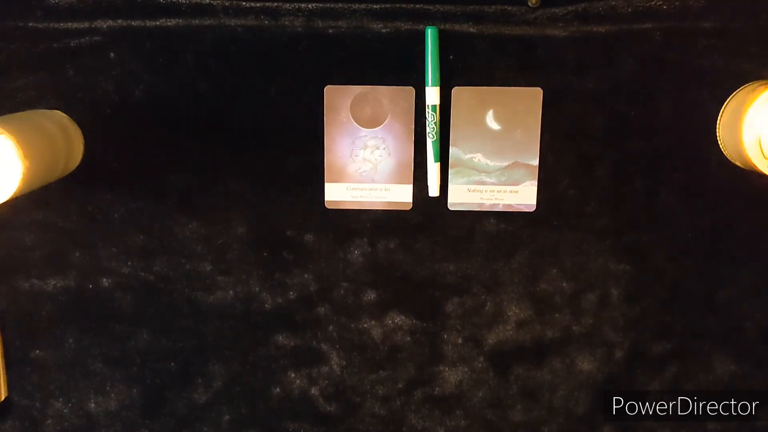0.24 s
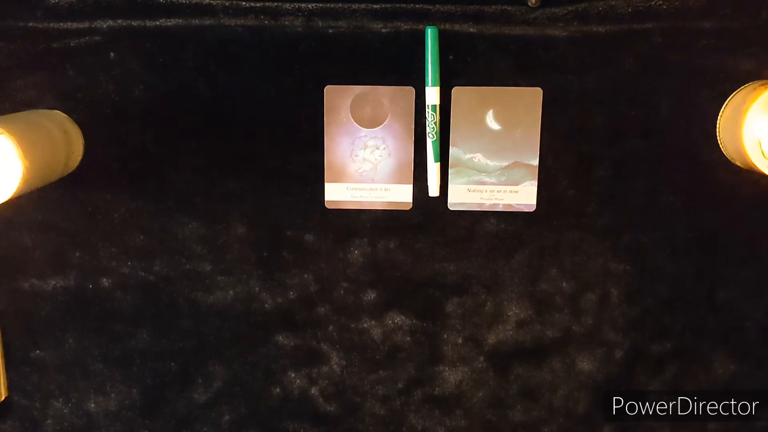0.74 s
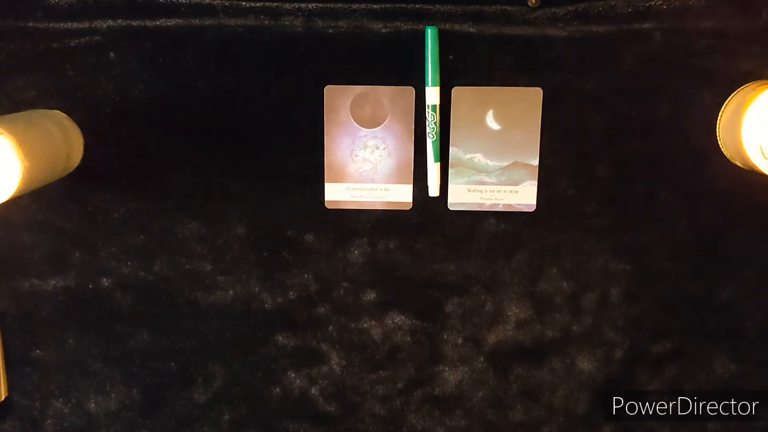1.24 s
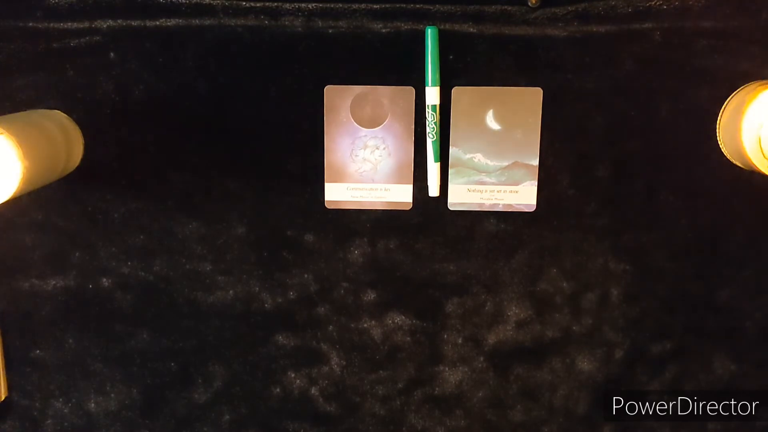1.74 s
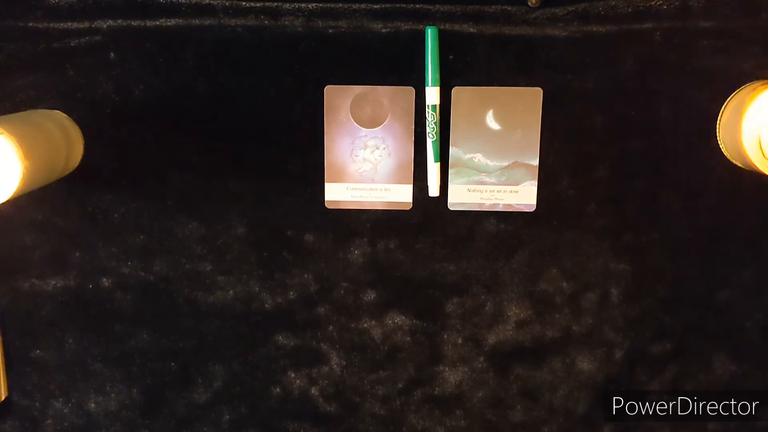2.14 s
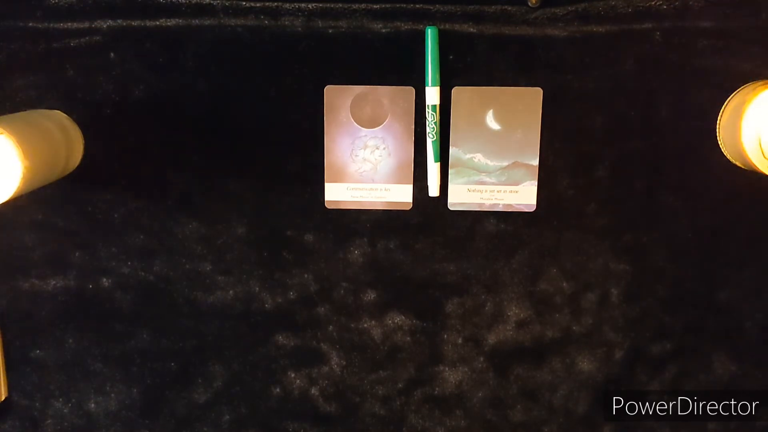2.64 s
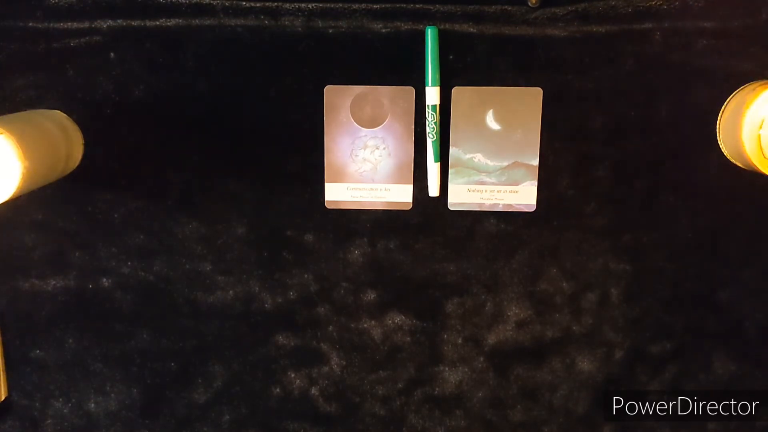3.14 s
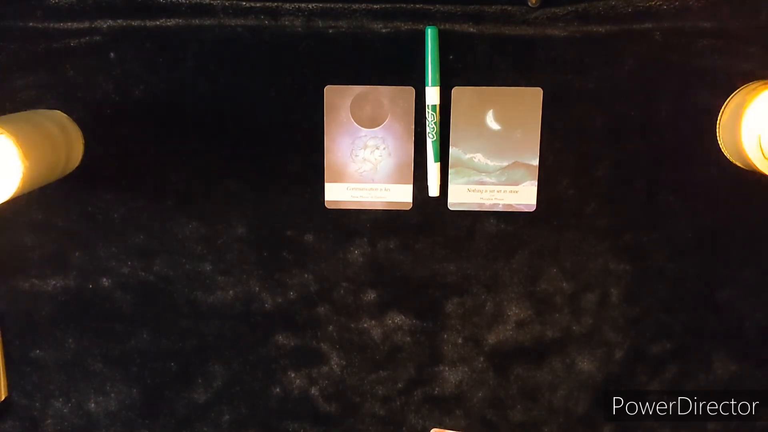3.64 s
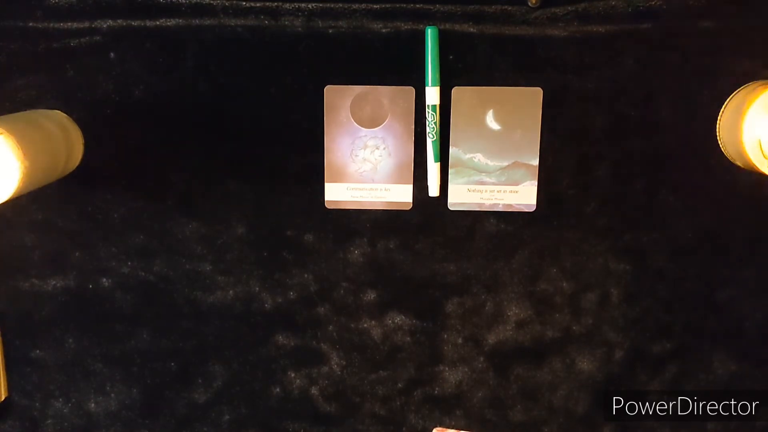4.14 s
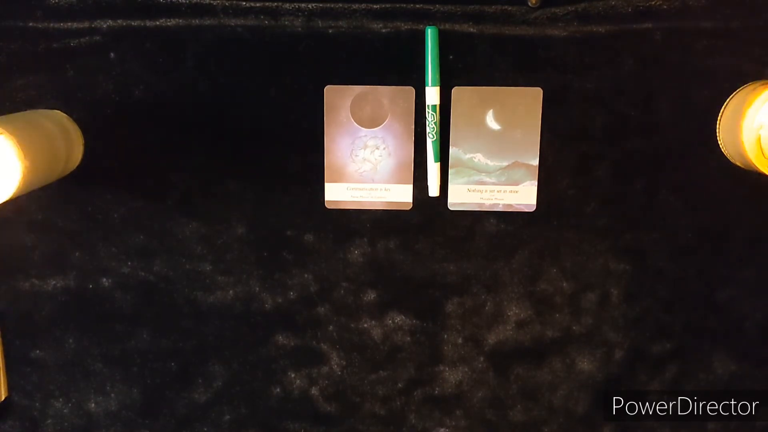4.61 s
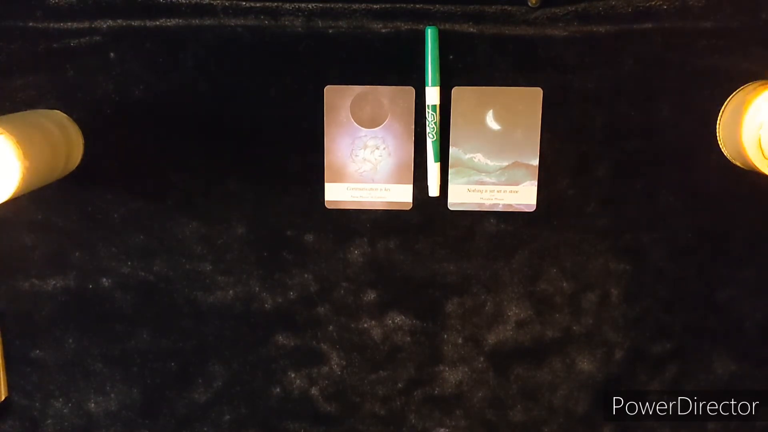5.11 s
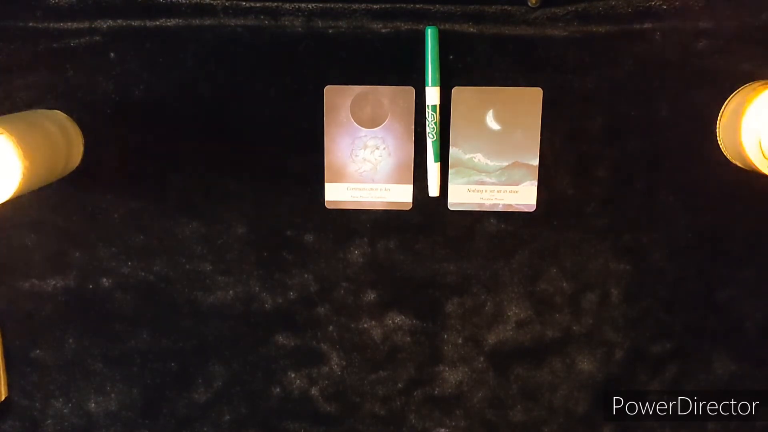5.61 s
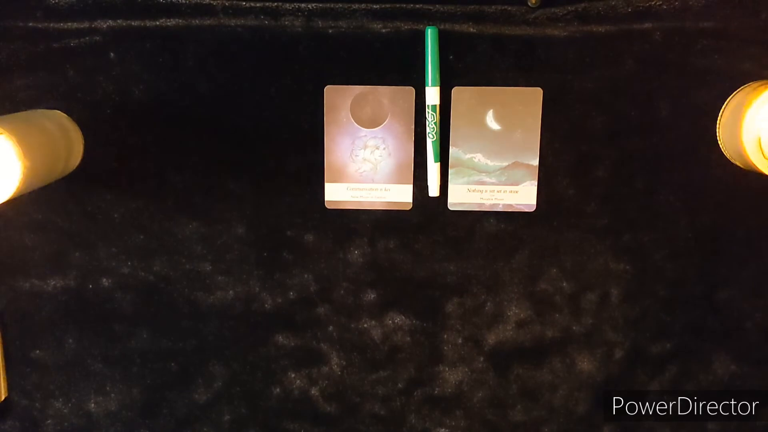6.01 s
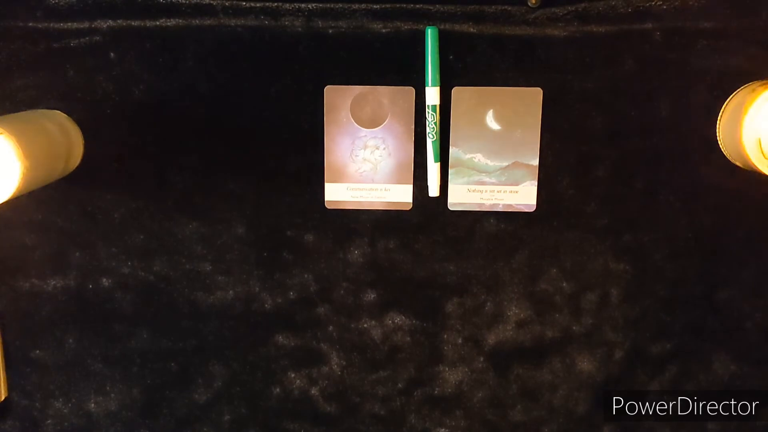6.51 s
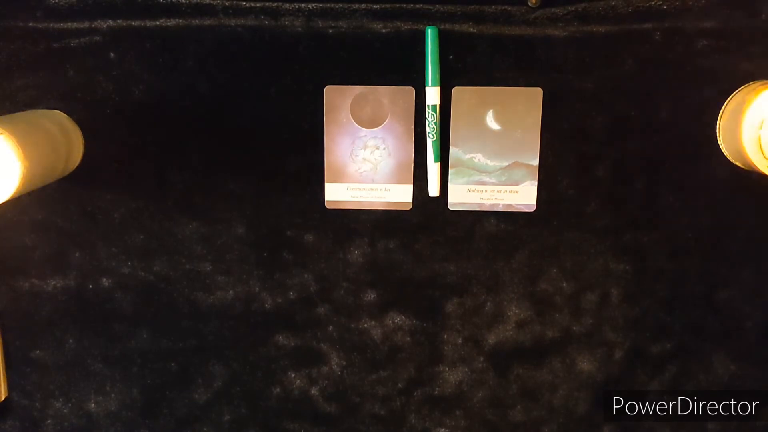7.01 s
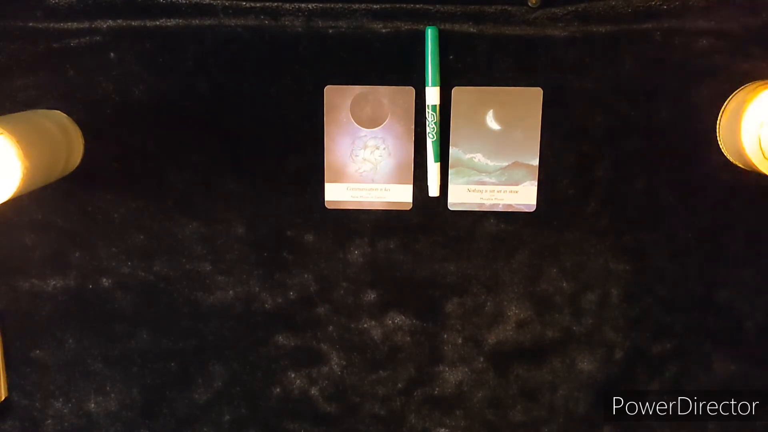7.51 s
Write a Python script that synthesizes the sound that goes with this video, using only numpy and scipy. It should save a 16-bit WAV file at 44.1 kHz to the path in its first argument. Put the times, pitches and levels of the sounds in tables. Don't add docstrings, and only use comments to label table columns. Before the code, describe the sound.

A deck of cards handled very close to a stereo microphone in a small quiet room with faint airy ventilation hum. Light finger brushes and sparse dry ticks come first. Then the pack is pulled loose and shuffled in a quick crackling run of bright snaps, slaps and papery slides, with a brief buzz. It is squared with softer rubs, put down dully, and rapped three times amid low air buffets.

```python
import sys
import numpy as np
from scipy import signal
from scipy.fft import rfft, irfft
from scipy.io import wavfile

SR = 44100
rng = np.random.default_rng(int(sys.argv[2]) if len(sys.argv) > 2 else 0)


def volts_from_decibels(level):
    exponent = np.asarray(level, float) / 20
    return 10 ** exponent


def transcribe(signal):
    frames = np.atleast_2d(signal).T
    limited = np.clip(frames, -1, 1)
    pcm = np.round(limited * 32767).astype(np.int16)
    wavfile.write(sys.argv[1], SR, pcm)


N = 342216


def rms_one(x):
    return x / np.sqrt(np.mean(x ** 2) + 1e-20)


def at_hz(points, hz):
    points = np.array(points)
    return np.interp(np.log(hz), np.log(points[:, 0]), points[:, 1])


def band(x, low_hz, high_hz):
    sos = signal.butter(2, [low_hz, min(high_hz, .45 * SR)], "band", fs=SR, output="sos")
    return signal.sosfilt(sos, x + 1e-18)


def drift(rate):
    r = np.exp(-80 * np.pi * rate / SR)
    noise = rng.standard_normal(N // 40 + 2002)
    slow = signal.lfilter([1], [1, -2 * r, r * r], noise)[2000:]
    return np.interp(np.arange(N) / 40, np.arange(len(slow)), rms_one(slow))


def swells(rows):
    t = np.arange(0, N + 20, 20) / SR
    power = 0
    for s, peak_db, rise_s, fall_s in rows:
        drop = np.where(t < s, (s - t) / rise_s, (t - s) / fall_s)
        power = power + volts_from_decibels(peak_db - 20 * drop) ** 2
    return np.interp(np.arange(N) / SR, t, 10 * np.log10(power + 1e-15))


def coloured(x, spectrum):
    hz = np.maximum(np.arange(N // 2 + 1) * SR / N, 1)
    slope_db = -24 * np.maximum(np.log2(spectrum[0][0] / hz), 0)
    return rms_one(irfft(rfft(x) * volts_from_decibels(at_hz(spectrum, hz) + slope_db), N))


def add_at(times, shapes):
    length = shapes.shape[1]
    out = np.zeros(N + length)
    np.add.at(out, np.round(times * SR).astype(int)[:, None] + np.arange(length), shapes)
    return out


def clicks_at(times, level_db):
    out = np.zeros(N)
    np.add.at(out, np.round(times * SR).astype(int), volts_from_decibels(level_db))
    return out


def wavelets(times, level_db, hz, rise_s, decay_s, chance=1):
    t = np.arange(-2500, 2500) / SR
    rise = np.exp(-(t / rise_s[:, None]) ** 2)
    fall = np.exp(-np.abs(t) / decay_s[:, None])
    envelope = np.where(t < 0, rise, fall) * np.hanning(len(t))
    phase = 2 * np.pi * (hz[:, None] * t + 1 / 4 + chance * rng.random((len(times), 1)))
    return add_at(times, volts_from_decibels(level_db)[:, None] * envelope * np.sin(phase))[2500:N + 2500]


def bursts(times, level_db, decay_s, low_hz, high_hz):
    t = np.arange(1200) / SR
    dying = np.exp(-t / np.reshape(decay_s, (-1, 1)))
    shapes = band(rng.standard_normal((len(times), len(t))) * dying, low_hz, high_hz)
    shapes /= np.abs(shapes).max(axis=1, keepdims=True)
    return add_at(times, shapes * volts_from_decibels(level_db)[:, None])[:N]


def ring(clicks, hz, t60):
    r, w = volts_from_decibels(-60 / (t60 * SR)), 2 * np.pi * hz / SR
    return signal.lfilter([0, np.sin(w)], [1, -2 * r * np.cos(w), r * r], clicks + 1e-18)


# f/Hz, likeness (1 = same at both ports)
LIKENESS = [(60, 0.76), (180, 1), (550, 0.82), (1650, -0.2), (4970, 0.075), (15000, -0.14)]


def diffuse(size, band_gain):
    out, edges = 0, 28 * 2 ** np.arange(0, 9.6, .5)
    white = rng.standard_normal((2, 2, size))
    for k, (low, high) in enumerate(zip(edges, edges[1:])):
        centre = np.sqrt(low * high)
        mid, side = band(white[k % 2], low, high)
        alike = np.clip(at_hz(LIKENESS, centre), -1, 1)
        stereo = np.sqrt(1 + alike) * mid + np.sqrt(1 - alike) * side * [[1], [-1]]
        out = out + band_gain(centre) * stereo
    return out


# f/Hz, level/dB per Hz
HUM = [(35, -5), (90, -11.5), (124, -12), (185, -32), (290, 2.5), (400, -8.5), (530, -8), (750, -19),
       (1070, -25.5), (1500, -22), (2130, -31.5), (3000, -40.5), (6000, -39), (16000, -53.5)]
# f/Hz, width/Hz, level/dB
MOTOR = (118.8, 14, -65)


def ventilation():
    together = .45 * drift(2.5)
    air = diffuse(N, lambda hz: volts_from_decibels(at_hz(HUM, hz) + together + 0.43 * drift(9)))
    hz, width_hz, level_db = MOTOR
    motor = band(rng.standard_normal(N), hz - width_hz / 2, hz + width_hz / 2)
    return volts_from_decibels(-54) * rms_one(air) + volts_from_decibels(level_db) * rms_one(motor)


# t/s, peak level/dB, rise/s, fall/s
BRUSHES = [(0.0, -68, 0.045, 0.056), (0.18, -69.5, 0.22, 0.036), (0.51, -83, .06, .08),
           (0.69, -70.5, 0.087, 0.098), (0.96, -57, .012, .05), (1.08, -70, 0.18, 0.039),
           (1.38, -85, .3, .4), (1.79, -56.5, 0.12, 0.039), (2.03, -67, 0.27, 1.6), (2.33, -68, 0.17, .3),
           (2.44, -64, 0.3, .08), (2.64, -58, 0.21, 0.063), (2.88, -60, 0.023, .03), (3.08, -76, .1, 0.55),
           (3.2, -60, 0.063, 0.062), (3.52, -81, .2, 0.092), (5.385, -58.5, 0.023, 0.16),
           (5.61, -53.5, 0.12, 0.028), (5.9, -62.5, 0.25, 0.19), (6.22, -62.5, 0.18, 0.43),
           (6.51, -58, .14, 0.033), (6.76, -72.5, 0.051, 1.1), (7.62, -68, 0.12, 1.5)]
# t/s, peak level/dB, rise/s, fall/s
STROKES = [(3.638, -41.5, 0.077, 0.33), (3.83, -47, 0.1, 0.66), (4.06, -50, .05, 0.15),
           (4.29, -40, 0.085, 0.22), (4.375, -35, 0.24, 0.019), (4.559, -46, 0.043, 0.024),
           (4.63, -57, 0.055, 0.22), (4.74, -44.5, 0.14, 0.053), (4.85, -56, 0.083, .1),
           (4.905, -42.5, .02, 0.13), (5.08, -42.5, 0.71, 0.27), (5.22, -43, 0.57, 0.036)]
# t/s, peak level/dB, rise/s, fall/s
BENDS = [
    (3.742, -40.5, 0.31, 0.25),
    (4.09, -52, 0.61, 0.12),
    (4.34, -41, 0.11, 0.09),
    (4.726, -57, .14, 0.76),
    (5.04, -46.5, 0.61, 0.1),
]
# t/s, peak level/dB, rise/s, fall/s
DRAGS = [
    (0.51, -68.5, 0.066, 0.052),
    (2.33, -72, 0.077, 0.14),
    (3.03, -66.5, 0.27, 0.11),
    (3.762, -51.5, 0.34, 0.12),
    (3.958, -54, 0.22, .09),
    (4.18, -57, 0.059, 0.08),
    (4.83, -49, 0.011, 0.038),
    (5.13, -56, 0.079, 0.03),
    (6.5, -66, .15, 0.065),
    (7.62, -70.5, 0.19, 1.5),
]
# f/Hz, level/dB per Hz
HISS = [(2500, -4.5), (4500, 2.5), (7000, 2.5), (9500, -1), (12000, 5), (15000, -2)]
# f/Hz, level/dB per Hz
RUB = [(600, 9), (1100, 6), (1800, 4), (2600, 2), (4000, -6.5), (6000, -12)]


def sliding():
    rub_under_slide_db, rub_rest_db = -13.5, -78
    hiss_db, bend_db = swells(BRUSHES + STROKES), swells(BENDS)
    pressed = volts_from_decibels(hiss_db + rub_under_slide_db) + volts_from_decibels(swells(DRAGS)) + volts_from_decibels(rub_rest_db)
    spikes = volts_from_decibels(2.6 * np.minimum(rng.exponential(1, (3, N)), 4))
    grain = rng.standard_normal((3, N)) * spikes
    clump_db = 2.8 * drift(60)
    hiss = volts_from_decibels(hiss_db + clump_db - 5.5) * coloured(grain[0], HISS)
    rub = pressed * volts_from_decibels(clump_db + 2.6 * drift(40)) * coloured(grain[1], RUB)
    creak = volts_from_decibels(bend_db - 5.5 + 3.1 * drift(35)) * rms_one(band(grain[2], 260, 710))
    return hiss + rub + creak


# f/Hz, t60/s
ROOM_T60 = [(200, 0.23), (1400, 0.21), (4000, 0.19), (14000, 0.2)]
# f/Hz, level/dB
ROOM_COLOUR = [(300, -5), (1500, -4), (4500, 3.5), (9000, -0.5), (14000, -4.5)]


def room(x):
    t = np.arange(int(.4 * SR)) / SR
    onset = np.clip((t - .0008) / 0.00093, 0, 1)
    place = 2 * np.pi * np.arange(N) / SR * 3.7
    out = 0
    for share in (np.cos(place), np.sin(place), np.cos(place / 3)):
        tail = diffuse(len(t), lambda hz: volts_from_decibels(-60 * t / at_hz(ROOM_T60, hz) + at_hz(ROOM_COLOUR, hz)))
        tail = tail * onset / np.sqrt(3)
        out = out + signal.fftconvolve(share * x[None], tail, axes=1)[:, :N]
    return volts_from_decibels(-25.5) * out


# t/s, level/dB, f/Hz
LEFT_EDDIES = [(0.097, -38.5, 62.4), (0.137, -40, 53), (6.565, -43, 72), (6.623, -31.5, 98.5),
               (6.716, -19.5, 96), (6.742, -17.5, 117), (6.761, -18.5, 106), (6.821, -33, 71.5),
               (6.849, -35, 90.5), (6.898, -36, 65), (6.929, -28, 72), (6.974, -29.5, 103.5),
               (7.024, -27, 67.6), (7.06, -41, 74), (7.129, -43, 55)]
# t/s, level/dB, f/Hz
RIGHT_EDDIES = [(6.328, -34.5, 72.4), (6.358, -23.5, 58), (6.431, -31, 78.4), (6.534, -33, 70.6),
                (6.567, -29, 69.4), (6.617, -38, 61.9), (6.659, -38, 63), (6.705, -33, 66.6),
                (6.756, -44, 94.3), (6.816, -32, 65), (6.856, -27, 107), (6.887, -36, 81.2),
                (6.935, -31, 67.5), (7.013, -32, 79.5), (7.063, -30.5, 59.7), (7.106, -35.5, 56.3),
                (7.22, -48, 80), (7.282, -42, 71)]


def draught():
    half_cycles, shorter_per_db = 0.84, 0.93
    ports = []
    for eddies in (LEFT_EDDIES, RIGHT_EDDIES):
        s, level_db, hz = np.transpose(eddies)
        half_s = half_cycles / hz * volts_from_decibels(-shorter_per_db * (level_db + 33.5))
        ragged = 1 + 0.14 * rms_one(band(rng.standard_normal(N), 23, 150))
        ports.append(ragged * wavelets(s, level_db, hz, 1.85 * half_s, 1.3 * half_s))
    return np.array(ports)


# t/s, edge click level/dB, face slap level/dB, slap f/Hz
TICKS = [(0.507, -52, -60, 1210), (0.9498, -43.5, -44, 1280), (1.214, -66, -52, 1200),
         (1.3068, -58, -52, 1200), (1.3764, -58, -70, 1680), (2.4016, -46.5, -39, 1900),
         (2.8752, -36.5, -27.5, 1760), (2.974, -50.5, -64, 1530), (3.042, -51, -44, 1780),
         (3.1905, -48.5, -58, 1410), (3.462, -48.5, -63, 1210), (5.8297, -51, -49, 1190),
         (6.2724, -47, -63, 1713), (7.5823, -55, -48, 2270), (7.588, -50.5, -50, 2200),
         (7.6011, -53, -53, 2000)]
# t/s, edge click level/dB, face slap level/dB, slap f/Hz
LOOSEN = [(3.5126, -46.5, -51, 1498), (3.5645, -62, -57, 2000), (3.58, -42, -48, 3000),
          (3.5901, -42.5, -35, 1694), (3.5944, -39, -35.5, 1712), (3.6216, -22.5, -24, 1362),
          (3.6297, -18, -12, 2900), (3.654, -34.5, -42, 2300), (3.6862, -24.5, -18, 1620),
          (3.702, -32.5, -24.5, 2500), (3.7156, -34, -29.5, 1500), (3.7434, -36.5, -34.5, 1400),
          (3.75, -36, -23.5, 1435), (3.7586, -30.5, -38.5, 1710), (3.796, -44.5, -40.5, 1500),
          (3.8, -37, -35.5, 1500), (3.8148, -26.5, -18.5, 2036), (3.8473, -43, -29, 1722),
          (3.8552, -25, -21, 1423)]
# t/s, edge click level/dB, face slap level/dB, slap f/Hz
SPRING = [(3.8881, -7, -23, 1710), (3.9238, -19.5, -33.5, 1490), (3.937, -19, -21.5, 2700),
          (3.9623, -17.5, -30.5, 1500), (3.9937, -31.5, -28, 3100), (4.008, -23, -14.5, 1500),
          (4.0118, -7.5, -14, 2900), (4.029, -28.5, -29, 2500), (4.0371, -32, -46, 2550),
          (4.075, -41, -26.5, 1220), (4.1191, -7.5, -15, 2470), (4.133, -23, -36, 2493),
          (4.148, -15.5, -14, 2416), (4.1497, -16.5, -29, 2500), (4.1519, -14, -35, 2516),
          (4.16, -14, -18.5, 3200), (4.1598, -18.5, -29.5, 2500), (4.1683, -12.5, -30, 2485),
          (4.169, -12.5, -31.5, 2485), (4.171, -22, -30.5, 2500), (4.1669, -8.5, -14.5, 2510),
          (4.2414, -36, -48, 2500), (4.2546, -7, -16, 2800), (4.2552, -17.5, -29.5, 2440),
          (4.266, -21.5, -37, 2500), (4.3213, -23.5, -16, 2620), (4.34, -26.5, -38, 2900),
          (4.3451, -20, -25, 3020), (4.3524, -14.5, -15.5, 3780), (4.386, -34.5, -45, 2700)]
# t/s, edge click level/dB, face slap level/dB, slap f/Hz
SQUARE = [(4.56, -29, -55, 2810), (4.711, -46, -36.5, 1770), (4.7488, -43.5, -33.5, 1150),
          (4.788, -43, -41.5, 2100), (4.8307, -27, -31.5, 2160), (4.9064, -25, -30.5, 2050),
          (4.9085, -25, -32.5, 2500), (4.9193, -41, -29, 3250), (4.9557, -45, -25.5, 1660),
          (4.972, -44, -28.5, 2760), (5.0008, -40, -29.5, 2090), (5.0039, -38.5, -22, 2070),
          (5.03, -37.5, -27.5, 1870), (5.0756, -31, -31, 1980), (5.1258, -29.5, -26.5, 2210),
          (5.2194, -26, -19, 2000), (5.2241, -36, -25, 1930), (5.234, -30.5, -34.5, 2400),
          (5.2681, -38, -54, 2120), (5.346, -58, -54, 1800), (5.3884, -47, -44, 1520)]
EDGE_HZ = [
    6600,
    6750,
    7600,
    7200,
]


def contacts():
    handlings = zip((TICKS, LOOSEN, SPRING, SQUARE), EDGE_HZ)
    listed = np.array([row + (hz,) for table, hz in handlings for row in table])
    again = listed + [0, -25, -5.5, 0, 0]
    again[:, 0] += 0.0033 * rng.uniform(.7, 1.3, len(listed))
    s = 3.55 + np.cumsum(rng.exponential(1 / 30, 80))
    slide_db = swells(STROKES)[np.minimum(s * SR, N - 1).astype(int)]
    stray_db = slide_db + 6.0 + rng.normal(0, 3.0, (2, len(s)))
    face_hz = 2000 * np.exp(rng.normal(0, .25, len(s)))
    strays = np.transpose([s, *stray_db, face_hz, 0 * s + EDGE_HZ[0]])[s < 5.4]
    rows = np.vstack([listed, again, strays])
    harder_db = np.maximum(rows[:, 1], -60) + 25
    rows[:, 4] *= np.exp(0.008 * harder_db + 0.04 * rng.standard_normal(len(rows)))
    return rows.T


def snaps():
    s, edge_db, face_db, face_hz, edge_hz = contacts()
    gentle = np.clip(-(edge_db + 16.0) / 22, 0, 1)
    edge = wavelets(s, edge_db + 1.0 - 4 * gentle, edge_hz, .8 / edge_hz, 0.96 / edge_hz, chance=0)
    sharp = band(clicks_at(s, edge_db + 6.5 - 3 * gentle), 4000, 27000)
    rise_s, fall_s = .35 / face_hz, (.55 + .3 * gentle) / face_hz
    face = wavelets(s, face_db - 0.5, face_hz, rise_s, fall_s)
    sizzle_db, sizzle_s = edge_db - 3.5 + 4 * gentle, 0.00095 + 0.0035 * gentle
    sizzle = [bursts(s, sizzle_db, sizzle_s, 2500, 15500) for port in "LR"]
    return edge, sharp + face, np.array(sizzle)


# t/s, level/dB, f/Hz
THUMPS = [(2.873, -36.5, 630), (3.562, -35, 278), (5.384, -38.5, 990), (3.59, -25.5, 620),
          (3.626, -21, 900), (3.626, -27.5, 302), (3.682, -21, 480), (3.714, -25.5, 330),
          (3.755, -26.5, 604), (3.745, -29, 269), (3.812, -32, 290), (3.812, -24, 800), (3.842, -26, 520),
          (3.919, -34, 264), (4.005, -18, 810), (4.005, -25, 335), (4.073, -27.5, 570), (4.117, -24, 890),
          (4.117, -31.5, 380), (4.144, -31, 277), (4.17, -32.5, 292.5), (4.165, -28, 990),
          (4.251, -34, 574), (4.307, -34, 326), (4.34, -26.5, 266), (4.788, -36, 622), (4.832, -35, 293),
          (4.903, -33.5, 790), (4.94, -37, 590), (5.07, -33, 294), (5.121, -30.5, 304), (5.153, -35.5, 315),
          (5.189, -38, 320), (5.221, -29, 596)]
# t/s, level/dB, f/Hz
SETTLE = (5.612, -33.5, 263)


def thumps():
    s, level_db, hz = np.transpose(THUMPS)
    pulse = wavelets(s + 0.00303, level_db - 2.5, hz, 0.42 / hz, 1.07 / hz)
    push = wavelets(s + 0.00742, level_db - 24.5, 0 * s + 120, 0 * s + 0.0044, 0 * s + 0.0071)
    at, settle_db, settle_hz = np.transpose([SETTLE])
    settle = wavelets(at, settle_db, settle_hz, 1.9 / settle_hz, 0.92 / settle_hz)
    return pulse + push + settle


# t/s, peak level/dB, rise/s, fall/s
PLUCKS = [
    (4.125, -45, .01, .06),
    (4.17, -40.5, 0.034, 0.063),
    (4.22, -50, .04, 0.043),
    (4.26, -48, .01, 0.055),
    (4.325, -46, .01, .04),
]
# low f/Hz, high f/Hz
BOW = (2330, 2780)


def bow():
    return volts_from_decibels(swells(PLUCKS) + 5.4 * drift(50)) * rms_one(band(rng.standard_normal(N), *BOW))


# t/s, echo share, echo lag/ms
TABLE_ECHO = [
    (4.5, 0, .14),
    (4.56, .55, .13),
    (4.72, .55, .135),
    (4.8, .55, .12),
    (4.9, .45, .11),
    (4.95, 0, .125),
]


def near_table(x):
    s, share, lag_ms = np.transpose(TABLE_ECHO)
    t = np.arange(N) / SR
    share = np.interp(t, s, share)
    echo_t = t - np.interp(t, s, lag_ms) / 1000
    echo = np.interp(echo_t, t, band(x, 1500, 6500))
    return (x + share * echo) / np.sqrt(1 + share ** 2 / 4)


# t/s, crack level/dB, then table, palm and pack ring level/dB
KNOCKS = [
    (6.784, -23.5, -58, -60, -30.5),
    (6.7864, -38.5, -29.5, -29.5, -54),
    (7.0097, -28.5, -34, -39, -15),
    (7.2505, -29, -53, -29, -19.5),
]
# f/Hz, level/dB, t60/s
PACK = [
    [(272, 2, 0.054), (380, -1.5, 0.066), (794, 5.5, 0.019)],
    [(494, -7.5, 0.12), (575, -0.5, 0.053)],
    [(810, -11, 0.031), (996, -23, 0.086), (1150, -21, 0.1), (1232, -22, 0.08), (1680, -10.5, 0.017),
     (1770, -29, 0.09)],
]


def knocks():
    s, crack_db, *ring_db = np.transpose(KNOCKS)
    modes = 0
    for group, group_db in zip(PACK, ring_db):
        for hz, level_db, t60 in group:
            hit_db = group_db + level_db + 0.5 + rng.normal(0, 0.65, len(s))
            modes = modes - ring(clicks_at(s, hit_db), hz, t60)
    soft = signal.sosfilt(signal.butter(3, 1900, fs=SR, output="sos"), modes)
    rap = wavelets(s + 0.00158, ring_db[2] + 2.0, 0 * s + 1070, 0 * s + .001, 0 * s + .001)
    crack_low = band(clicks_at(s + .0006, crack_db + 21.0), 1200, 2670)
    crack_high = band(clicks_at(s + .0006, crack_db + 5.5), 2700, 7390)
    rustle = bursts(s, crack_db - 9.0, 0.0066, 1760, 16000)
    return soft + rap + crack_low + crack_high + rustle


def scene():
    right_lag_s, edge_right_db = 0.00012, 2
    beamed, edges, sizzle = snaps()
    hands = edges + thumps() + bow() + near_table(sliding()) + knocks()
    hz = np.arange(N // 2 + 1) * SR / N
    delay = np.exp(-2j * np.pi * hz * right_lag_s)
    later = irfft(rfft(hands + volts_from_decibels(edge_right_db) * beamed) * delay, N)
    direct = np.array([hands + beamed, later]) + sizzle
    reflected = room(hands + 0.46 * beamed)
    return direct + reflected + draught() + ventilation()


def band_limit(x):
    return signal.sosfilt(signal.butter(12, 16850, fs=SR, output="sos"), x)


def record(dry):
    heard = signal.sosfilt(signal.butter(6, 41, "high", fs=SR, output="sos"), dry)
    heard = signal.sosfilt(signal.cheby2(10, 18, 15900, fs=SR, output="sos"), heard)
    mix = np.clip(heard, -1, 1)
    return band_limit(mix)


dry = scene()
out = record(dry)
transcribe(out)
```